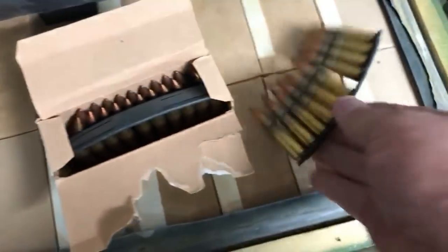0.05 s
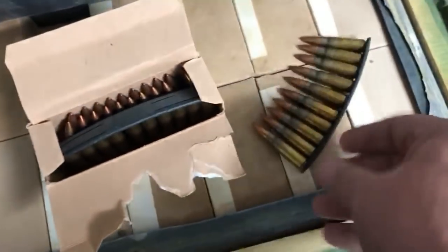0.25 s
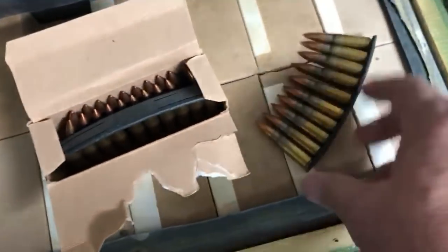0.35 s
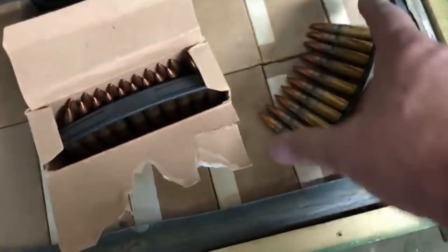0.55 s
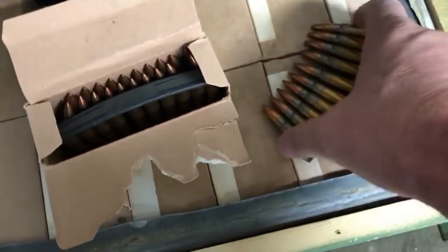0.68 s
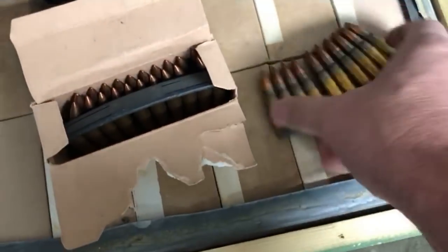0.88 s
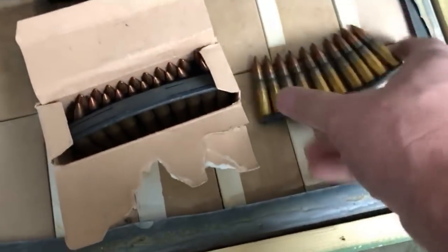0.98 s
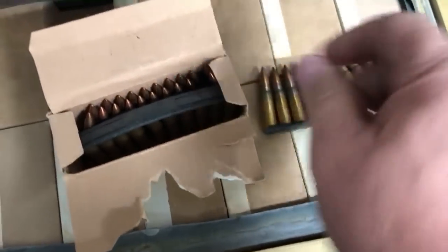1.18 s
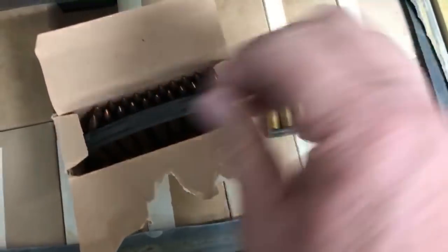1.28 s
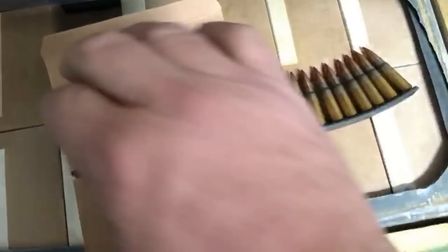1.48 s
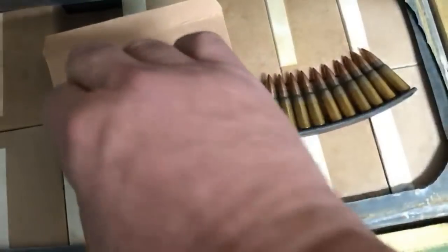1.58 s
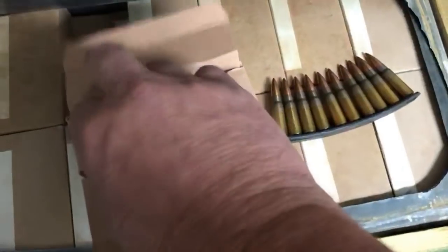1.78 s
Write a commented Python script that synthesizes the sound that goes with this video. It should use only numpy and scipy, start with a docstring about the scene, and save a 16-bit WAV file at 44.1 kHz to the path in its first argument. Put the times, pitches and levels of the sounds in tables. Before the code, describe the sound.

A metal clip of rifle cartridges drops onto cardboard, rattles, and is slid across it.

```python
"""In a small, faintly humming room, a steel clip of rifle cartridges drops onto flat cardboard close by.
It bounces, rattles and settles; a hand slides it across the board, then taps the carton beside it.
Each contact knocks the board and clacks the steel, and the brass cases ping against each other.
The slide is a stream of tiny slips of metal on fibre that make board and steel sing."""
import sys
import numpy as np
from scipy import signal
from scipy.fft import rfft, irfft
from scipy.io import wavfile
from scipy.ndimage import uniform_filter1d

SR = 44100
rng = np.random.default_rng(int(sys.argv[2]) if len(sys.argv) > 2 else 0)


def file_out(sig):
    """Save sig as 16-bit WAV at sys.argv[1]."""
    # one column per channel
    cols = np.atleast_2d(sig).T
    # limit, then scale
    lim = np.clip(cols, -1, 1)
    pcm = np.round(lim * 32767).astype(np.int16)
    wavfile.write(sys.argv[1], SR, pcm)


N = 81585
T = np.arange(N) / SR
HIT_T = T[:4096]

# room tone spectrum: freq_hz, level_db
AIR_EQ = [(15, -42), (25, -8.5), (102, 1.5), (145, -7.5), (170, -14.5), (256, -7.5), (344, -16.5),
          (516, -17), (863, -25), (1020, -30.5), (1610, -30), (2410, -40), (4740, -41), (5140, -44.5),
          (16000, -50.5)]
# appliance hum and whine: pitch_hz, level_db
HUM_TONES = [(59.5, -63.5), (78, -63), (119.5, -59), (165, -67), (212, -67.5), (249, -63), (287, -67),
             (887, -77), (4720, -90)]
# reverb bands: low_hz, high_hz, t60_s, level_db
ROOM_TAILS = [(30, 1600, .69, -14), (1800, 8000, .33, -16), (8000, 18000, .25, -14.5)]

# skin over brass: centre_s, level_db, width_s
BRUSHES = [(0.117, -66.5, 0.022), (.632, -71, 0.026), (1.32, -82, .04), (1.81, -69.5, 0.015)]
# its hiss: freq_hz, level_db
BRUSH_EQ = [(1500, -14), (5000, 0), (11000, 0), (16000, -7.5)]
# finger taps on the carton: start_s, level_db
TAPS = [(1.7706, -38.5), (1.773, -47.5), (1.835, -49.5), (1.8478, -45.5)]
# fingers rubbing the carton: time_s, level_db
RUB_ENVELOPE = [(1.765, -79), (1.778, -57), (1.80, -61.5), (1.85, -62.5)]
# the carton's papery tone: freq_hz, level_db
CARTON_EQ = [(120, -19), (300, -10.5), (600, -1), (1400, 1), (2200, -5.5), (4000, -9.5), (7000, -14.5),
             (10000, -23.5), (16000, -31)]
# its panels: pitch_hz, level_db, t60_s
CARTON_MODES = [(1215, -8, 0.045), (1570, -4, .009), (2180, -0.5, 0.014), (3490, -5, 0.017)]
# its flap giving way: centre_s, level_db, pitch_hz
FLAPS = [(1.7752, -47, 850), (1.7751, -48, 258), (1.7833, -47.5, 330)]

# pressure and speed of the slide: time_s, level_db
SLIDE_ENVELOPE = [(.75, -80), (.785, -53), (.83, -61), (.875, -57), (.93, -48), (.97, -49), (1.03, -49),
                  (1.072, -52.5), (1.09, -55.5), (1.125, -59), (1.16, -101)]
# metal scraping cardboard: freq_hz, level_db
SCRAPE_EQ = [(120, -54), (200, -5), (249, -4), (328, -5), (432, 1.5), (623, -16.5), (968, -5),
             (1560, -17.5), (2860, -19.5), (3190, -19.5), (3970, -20), (4950, -17), (12600, -24),
             (14100, -25), (16000, -38)]
# how hard the slide makes the parts sing: time_s, level_db
SING_ENVELOPE = [(.86, -57.5), (.99, -57), (1.03, -49.5), (1.07, -48), (1.10, -58), (1.14, -79)]
# the resonances that sing: pitch_hz, level_db, t60_s
SING_MODES = [(393, 12, 0.041), (960, -17, 0.023), (2100, -20, 0.011), (3270, -0.5, 0.02), (5060, 1, 0.006)]
# the board's groan as the slide ends: time_s, pitch_hz, level_db
GROAN = [(1.005, 463.6, -78), (1.027, 434, -40), (1.05, 378.3, -56), (1.074, 350.4, -47.5),
         (1.10, 345, -68)]
# edges catching: centre_s, level_db, width_s, pitch_hz
RASPS = [(.94, -59, 0.0064, 5100), (0.94, -60.5, 0.013, 1300), (1.018, -52.5, 0.0081, 3370),
         (1.039, -50.5, 0.0086, 5100), (1.04, -66, 0.011, 6330), (1.065, -55.5, 0.016, 5100),
         (1.071, -56.5, 0.022, 1904)]

# loose cartridges shivering: time_s, level_db
CHATTER_ENVELOPE = [(.2, -41), (.214, -26.5), (.24, -41.5), (.275, -58), (.293, -35), (.312, -65),
                    (.37, -52.5), (.41, -62), (.47, -81), (.53, -76)]
# ring of a brass case: pitch_hz, level_db, t60_s
CASE_MODES = [(8150, -8.5, 0.021), (8640, -5, .022), (11300, -7.5, 0.011), (14100, -3, .018)]
# case tapping case: start_s, level_db, pitch_hz
PINGS = [(0.138, -53, 14300), (0.1463, -34.5, 14300), (0.2477, -24, 14200), (0.249, -33, 8270),
         (.2545, -24, 14150), (0.265, -31, 8460), (.2695, -39, 14000), (.3095, -48, 14200),
         (0.309, -41, 8200), (.3228, -50, 14250), (.3405, -51, 14300), (.3617, -42, 14100),
         (0.361, -32.5, 8520), (0.3697, -29.5, 8580), (.386, -50, 14400), (.3865, -45, 8900),
         (.395, -53, 14200), (0.492, -58, 14330), (.764, -48.5, 8150), (0.774, -41, 8700),
         (.783, -33.5, 14300), (0.7821, -35, 8730), (0.8145, -43, 11170), (.985, -44.5, 8150),
         (1.0346, -37, 14230)]

# the full weight landing: start_s, level_db
LANDINGS = [(.2085, -15.5), (0.2867, -29)]
# the board as a drum: pitch_hz, level_db, t60_s
BOARD_MODES = [(204.4, -6, 0.044), (278.3, -2.5, 0.21), (324, 0.5, 0.03), (436.4, -4, 0.044),
               (506.6, -4, 0.09), (566.5, -14.5, 0.14), (647.3, -11.5, 0.18), (733, -16, 0.11),
               (809, -17.5, 0.052), (927, -12, 0.073), (978, -14.5, 0.034), (1080, -19.5, 0.041),
               (1263, -10, 0.12)]
# short low thuds of the board during the landing and bounces: centre_s, level_db, pitch_hz
THUDS = [(0.212, -20.5, 320), (0.29, -26.5, 218), (0.306, -32.5, 115), (.364, -36.5, 277), (0.411, -39, 91)]

# steel hitting the board: start_s, knock_db, clack_db, tick_db
CONTACTS = [(0.139, -82, -54.5, -50), (0.147, -65, -47.5, -39.5), (0.1995, -23, -16.5, -43),
            (.2029, -35, -48, -30), (0.2053, -16, -11.5, -15.5), (0.2081, -21.5, -29, -21.5),
            (.21, -19, -20, -29), (0.2127, -44, -25, -17.5), (0.214, -28, -17, -21), (.2305, -38, -53, -25),
            (.2492, -57, -51, -34), (0.2536, -51, -55, -33), (.263, -49, -52, -39.5),
            (0.2693, -27.5, -38, -29), (0.2745, -36, -29, -33), (0.2825, -44, -20, -39),
            (.284, -29, -23, -30), (.286, -24, -29, -26), (0.29, -31, -30, -29), (0.2942, -30.5, -34, -26),
            (0.2982, -38, -42, -42), (0.3084, -49, -57, -56), (0.3214, -28.5, -44, -60),
            (0.3336, -39.5, -33, -52), (0.3514, -47, -38.5, -62), (0.3543, -28.5, -33.5, -61),
            (0.3589, -34, -34.5, -48), (.3625, -32.5, -30.5, -38), (.37, -28, -40, -38),
            (.387, -35.5, -46, -60), (0.398, -43.5, -46, -68), (0.4377, -34.5, -34.5, -66),
            (0.4463, -37, -45.5, -83), (0.4549, -41, -48, -77), (.461, -35.5, -39.5, -74),
            (.494, -47, -49.5, -59), (0.752, -49, -56.5, -75), (.764, -55, -50.5, -56),
            (0.7745, -35, -45.5, -40.5), (0.784, -45.5, -44.5, -44), (0.7883, -41.5, -47.5, -66),
            (.798, -67, -49, -51), (0.808, -72, -60, -50), (0.8115, -60, -52, -39), (.819, -44.5, -56, -49),
            (0.8494, -42.5, -50.5, -70), (0.8978, -43, -71, -63), (1.022, -49.5, -49, -48),
            (1.0336, -52, -53, -40.5), (1.0633, -52, -40.5, -47)]
# cardboard body of a hit: freq_hz, level_db
KNOCK_EQ = [(100, -19), (260, -6), (480, 2.5), (700, -6.5), (980, -6), (1400, -9.5), (2100, -15),
            (4000, -34)]
# its metal bite: freq_hz, level_db
CLACK_EQ = [(600, -19), (1400, -3.5), (1950, 3.5), (3000, -4), (3600, -4), (6300, -7), (8000, -15),
            (16000, -32.5)]
# its treble edge: freq_hz, level_db
TICK_EQ = [(3000, -28.5), (6000, -3), (8500, -1.5), (11000, -1), (12800, -5.5), (14200, -0.5), (16000, -8)]
# the board's hollow note: pitch_hz, level_db, t60_s
HOLLOW_MODES = [(469, -7, 0.012), (860, -5, .025), (985, 2.5, .03)]
# the loaded steel strip: pitch_hz, level_db, t60_s
STRIP_MODES = [(1850, -0.5, .022), (2151, 3.5, 0.018), (2500, -3.5, 0.031), (2826, -0.5, .018),
               (3180, 1, 0.019), (4027, 0.5, 0.017), (4560, -5, .012), (6280, -3.5, 0.016)]
# notes of board or strip picked out by the struck spot: start_s, level_db, pitch_hz, t60_s
SPOT_NOTES = [(0.2076, -14, 447, .017), (.2285, -19.5, 600, 0.038), (.2835, -16.5, 967, 0.025),
              (.295, -25, 885, 0.033), (0.3591, -29, 1150, 0.045), (.3695, -29, 790, 0.024),
              (.4385, -28.5, 870, 0.02), (0.4609, -39, 1039, 0.068), (0.4943, -36, 1817, 0.015),
              (.776, -38, 1026, 0.017), (0.8976, -38.5, 983, 0.034), (1.0225, -39.5, 934, 0.051)]


def amp(db):
    """Decibels to gain."""
    return 10 ** (np.asarray(db) / 20)


def unit(x):
    """Scale to rms 1."""
    return x / np.sqrt(np.mean(x ** 2) + 1e-20)


def add(out, start_s, x):
    """Mix x into out from start_s on."""
    i = min(max(int(start_s * SR), 0), N)
    out[i:i + len(x)] += x[:N - i]


def curve(points):
    """A fader ride through (time_s, level_db) points, silent outside them."""
    s, db = np.array(points).T
    return amp(np.interp(T, s, db, left=-200, right=-200))


def swell(centre_s, db, width_s):
    """A bell-shaped fade in and out."""
    return amp(db) * np.exp(-((T - centre_s) / width_s) ** 2)


def attack(rise_s, t=HIT_T):
    """A quick fade in."""
    return 1 - np.exp(-t / rise_s)


def decay(t60_s, t=HIT_T):
    """A fade out that loses 60 dB in t60_s."""
    return np.exp(-np.log(1000) * t / t60_s)


def colour(x, eq, size=4096):
    """Minimum-phase EQ through (freq_hz, level_db) points; white noise keeps its power."""
    hz, db = np.array(eq).T
    bins_hz = np.maximum(np.arange(size // 2 + 1) * SR / size, 1)
    cepstrum = irfft(np.log(amp(np.interp(np.log(bins_hz), np.log(hz), db))))
    cepstrum[1:size // 2] *= 2
    cepstrum[size // 2 + 1:] = 0
    impulse = irfft(np.exp(rfft(cepstrum)))
    return signal.fftconvolve(x, impulse / np.linalg.norm(impulse))[:len(x)]


def burst(fall_s, passes=6):
    """A dying crunch of tiny contacts, even in spectrum, starting near rms 1."""
    env = np.exp(-HIT_T / fall_s)
    x = rng.standard_normal(len(env)) * env
    for _ in range(passes):
        flat = unit(irfft(np.exp(1j * np.angle(rfft(x)))))
        x = np.clip(flat * np.sqrt(np.mean(env ** 2)), -2 * env, 2 * env)
    return x


def grains(per_s, spread_db):
    """Random tiny impacts of uneven size, rms 1."""
    hits = (rng.random(N) < per_s / SR) * np.sign(rng.standard_normal(N))
    return unit(hits * amp(spread_db * np.minimum(rng.exponential(size=N), np.pi)))


def ring(hz, t60_s, t=HIT_T):
    """One decaying mode."""
    return np.sin(2 * np.pi * hz * t) * decay(t60_s, t)


def strike(modes, detune, scatter_db):
    """Modes struck at a random spot: pitch and strength of each vary."""
    chance = rng.standard_normal((len(modes), 2))
    return sum(amp(db + scatter_db * force) * ring(hz * (1 + detune * bend), t60)
               for (hz, db, t60), (bend, force) in zip(modes, chance))


def sing(x, modes):
    """Drive modes with x; white noise keeps its power."""
    impulse = sum(amp(db) * ring(hz, t60) for hz, db, t60 in modes)
    return signal.fftconvolve(x, impulse / np.linalg.norm(impulse))[:N]


def thud(centre_s, db, hz, width_cycles=1.3):
    """One short, dead swing of cardboard."""
    return np.sin(2 * np.pi * hz * (T - centre_s)) * swell(centre_s, db, width_cycles / hz)


def background(air_db=-54.5):
    """The bed: low room tone and the hum of an appliance."""
    hum = sum(amp(db) * np.sqrt(2) * np.sin(2 * np.pi * (hz * T + rng.random())) for hz, db in HUM_TONES)
    air = colour(rng.standard_normal(2 * N), AIR_EQ)[N:]
    return hum + amp(air_db) * unit(air)


def room(x, build_s=.024):
    """Add the reverb of a small room whose treble dies sooner than its bass."""
    out = x
    build = 1 - np.exp(-(T / build_s) ** 2)
    for low, high, t60, db in ROOM_TAILS:
        noise = rng.standard_normal(N) * decay(t60, T) * build
        band = signal.butter(2, [low, high], "band", fs=SR, output="sos")
        tail = signal.sosfilt(band, noise / np.linalg.norm(noise))
        out = out + amp(db) * signal.fftconvolve(x, tail)[:N]
    return out


def fingers():
    """Skin brushes softly over the cartridges."""
    env = sum(swell(s, db, width) for s, db, width in BRUSHES)
    return colour(rng.standard_normal(N) * env, BRUSH_EQ)


def carton(panel_db=-3):
    """Fingers rub and tap the carton; its panels ring and its flap gives way."""
    touch = grains(per_s=2500, spread_db=3.7) * curve(RUB_ENVELOPE)
    panels = np.zeros(N)
    for s, db in TAPS:
        add(touch, s, amp(db) * burst(fall_s=.0018))
        add(panels, s, amp(db + panel_db) * strike(CARTON_MODES, detune=.014, scatter_db=.5))
    return colour(touch, CARTON_EQ) + panels + sum(thud(s, db, hz) for s, db, hz in FLAPS)


def rasps(slips, t60_cycles=15):
    """Wherever an edge catches, the slips briefly drive one resonance."""
    return sum(sing(slips * swell(s, db, width), [(hz, 0, t60_cycles / hz)])
               for s, db, width, hz in RASPS)


def groan():
    """The board groans, falling in pitch as the steel comes to rest."""
    s, hz, db = np.array(GROAN).T
    phase = 2 * np.pi * np.cumsum(np.interp(T, s, hz)) / SR
    return np.sin(phase) * curve(np.c_[s, db])


def slide(scrape_db=3, stick_db=1.5, sticks_per_s=150):
    """Metal catches on the board's fibres in tiny slips, in fits and starts; board and strip sing."""
    hold = int(SR / sticks_per_s)
    steps = np.repeat(rng.standard_normal(N // 20), hold)[:N]
    stick = amp(stick_db * uniform_filter1d(steps, hold // 3 + 1))
    slips = grains(per_s=8000, spread_db=2.5) * stick
    scrape = amp(scrape_db) * colour(slips * curve(SLIDE_ENVELOPE), SCRAPE_EQ)
    singing = sing(slips * curve(SING_ENVELOPE), SING_MODES)
    return scrape + singing + rasps(slips) + groan() * stick


def chatter(knock_db=5.5, bright_db=-14):
    """Between the blows the loose cartridges shiver against each other and the board."""
    hits = grains(per_s=520, spread_db=-1) * curve(CHATTER_ENVELOPE)
    bright = colour(hits, TICK_EQ) + sing(hits, CASE_MODES) / 2
    return colour(hits, CLACK_EQ) + amp(knock_db) * colour(hits, KNOCK_EQ) + amp(bright_db) * bright


def pings(gain_db=5, case_db=-9, wobble_hz=150, wobble_s=.0012):
    """Brass on brass: one high ring tops the case's modes, wobbling as it buzzes on its neighbour."""
    out = np.zeros(N)
    for s, db, hz in PINGS:
        wobble = unit(uniform_filter1d(rng.standard_normal(len(HIT_T)), int(wobble_s * SR)))
        phase = 2 * np.pi * np.cumsum(hz + wobble_hz * wobble) / SR
        tone = np.sin(phase) * decay(t60_s=.019)
        case = amp(case_db) * strike(CASE_MODES, detune=.013, scatter_db=3.5)
        add(out, s, amp(db + gain_db) * (tone + case) * attack(rise_s=.0013))
    return out


def landings(thump_hz=96):
    """The falling weight drums the board, with short low thuds and a late thump from its support."""
    drum = sum(amp(db) * ring(hz, t60, T) for hz, db, t60 in BOARD_MODES) * attack(rise_s=.0018, t=T)
    thump = np.sin(2 * np.pi * thump_hz * T) * swell(centre_s=.027, db=-14, width_s=.015)
    out = sum(thud(s, db, hz) for s, db, hz in THUDS)
    for s, db in LANDINGS:
        add(out, s, amp(db) * (drum + thump))
    return out


def contacts(bite_db=3.5, hollow_db=-7, strip_db=-9):
    """Each hit layers a cardboard knock, a steel clack and a treble tick; board and strip ring on."""
    knock, clack, tick, tones = np.zeros((4, N))
    onset = attack(rise_s=.0004)
    for s, knock_db, clack_db, tick_db in CONTACTS:
        add(knock, s, amp(knock_db) * burst(fall_s=.0074) * attack(rise_s=.004))
        add(clack, s, amp(clack_db + bite_db) * burst(fall_s=.0016) * onset)
        add(tick, s, amp(tick_db + bite_db) * burst(fall_s=.0024) * onset)
        hollow = amp(knock_db + hollow_db) * strike(HOLLOW_MODES, detune=.03, scatter_db=7)
        strip = amp(clack_db + strip_db) * strike(STRIP_MODES, detune=.054, scatter_db=4)
        add(tones, s, (hollow + strip) * onset)
    for s, db, hz, t60 in SPOT_NOTES:
        add(tones, s, amp(db) * ring(hz, t60) * onset)
    return colour(knock, KNOCK_EQ) + colour(clack, CLACK_EQ) + colour(tick, TICK_EQ) + tones


def scene(ping_send=.35):
    """One microphone, the same in both channels; the pings stay nearly dry."""
    brass = pings()
    foley = contacts() + landings() + chatter() + slide() + carton() + fingers()
    mono = room(foley + ping_send * brass) + (1 - ping_send) * brass + background()
    return np.array([mono, mono])


def record(dry, low_cut_hz=58, high_cut_hz=15850):
    """Roll off the deep bass and cut the very top steeply."""
    thin = signal.sosfilt(signal.butter(3, low_cut_hz, "high", fs=SR, output="sos"), dry)
    return signal.sosfilt(signal.ellip(10, .2, 80, high_cut_hz, fs=SR, output="sos"), thin)


dry = scene()
out = record(dry)
file_out(out)
```